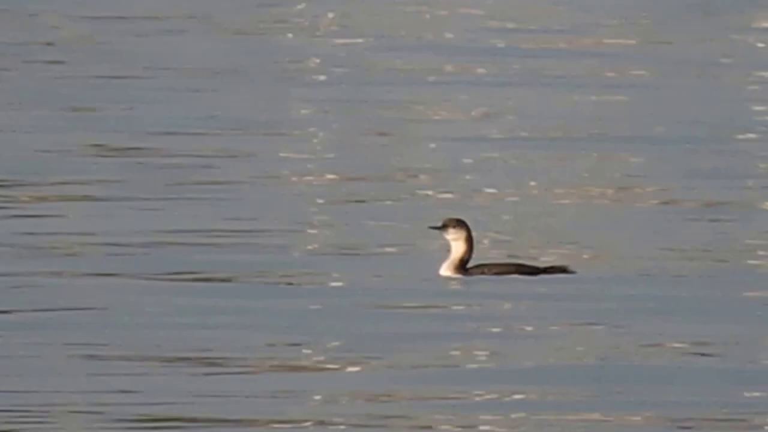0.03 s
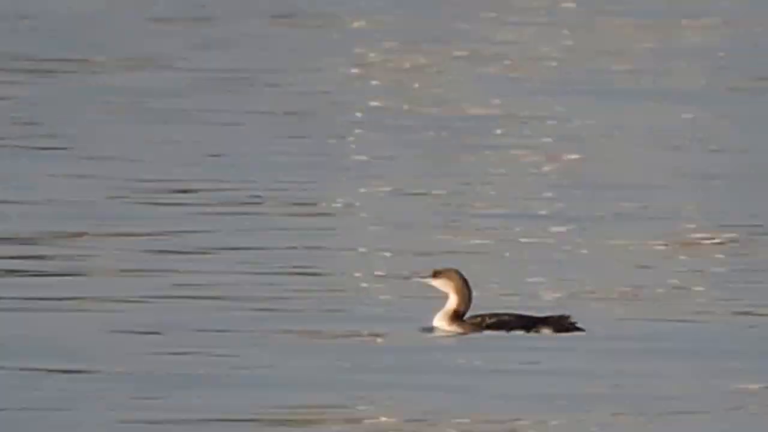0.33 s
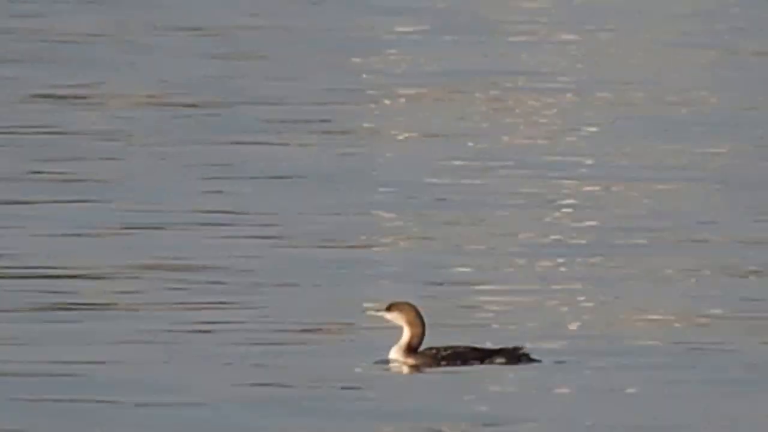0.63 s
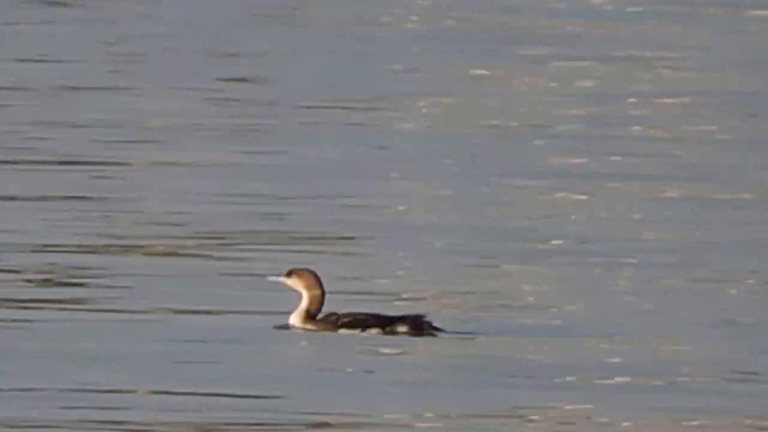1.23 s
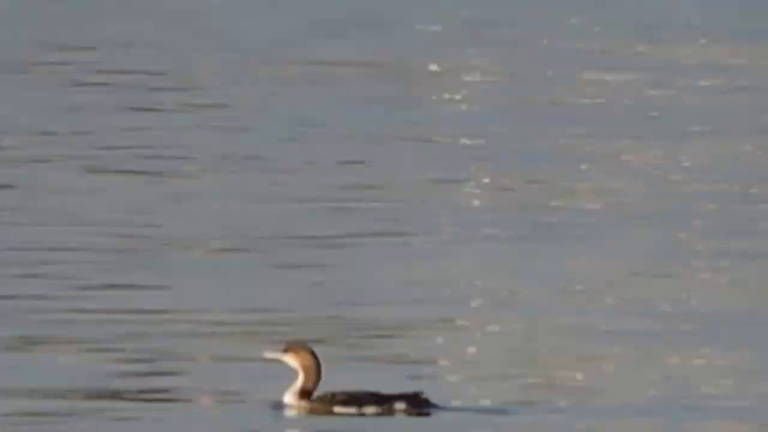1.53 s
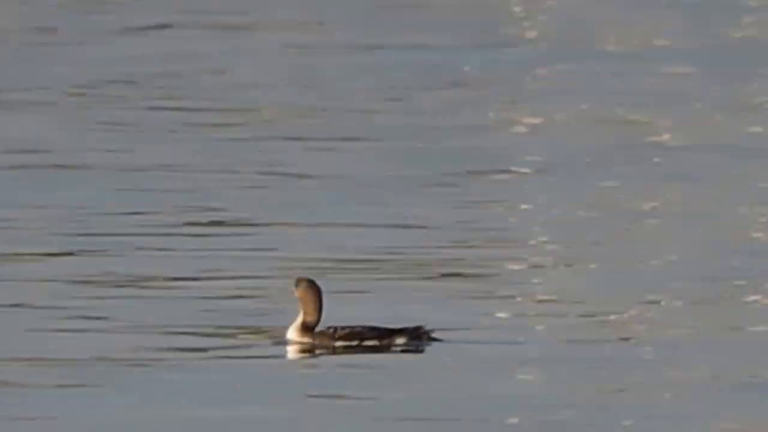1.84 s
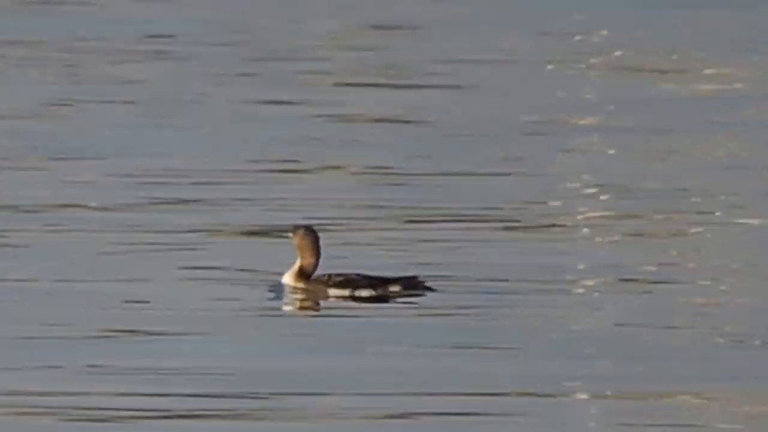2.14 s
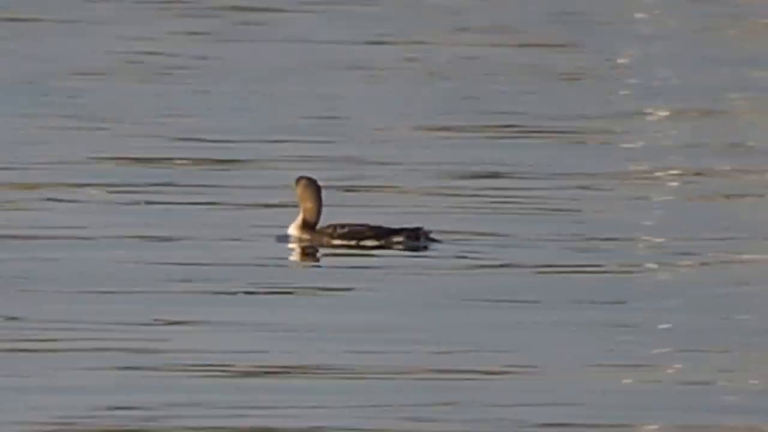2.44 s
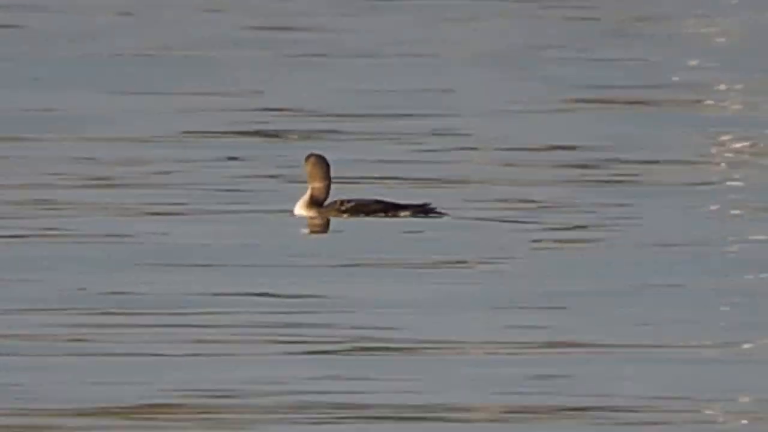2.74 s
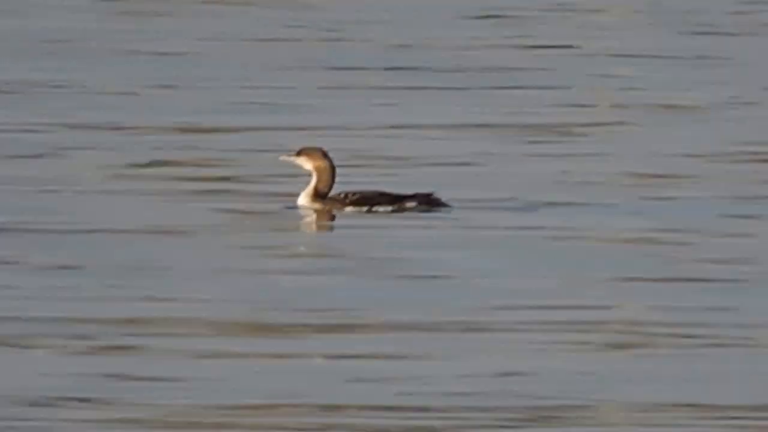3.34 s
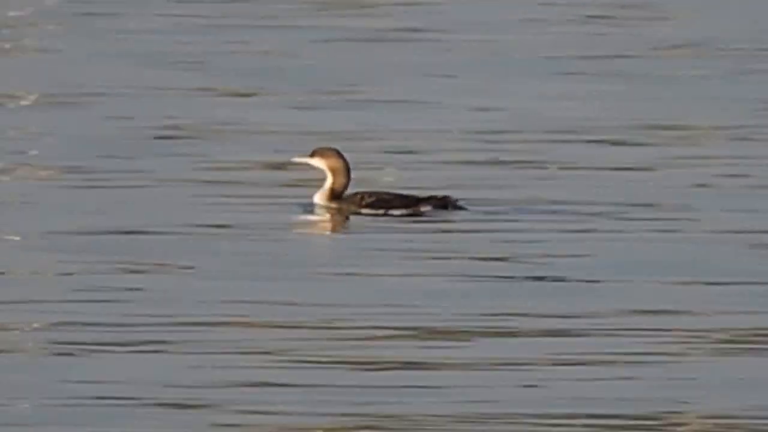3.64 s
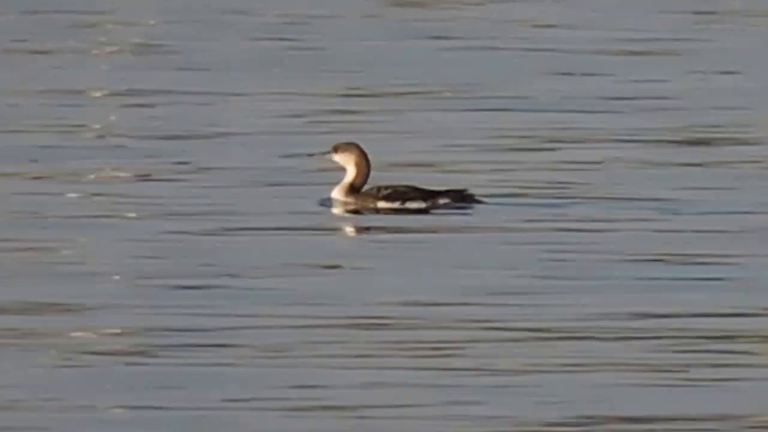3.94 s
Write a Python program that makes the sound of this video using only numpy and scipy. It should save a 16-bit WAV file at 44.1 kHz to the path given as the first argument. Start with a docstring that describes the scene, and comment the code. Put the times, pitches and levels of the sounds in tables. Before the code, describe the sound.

Low distant rumble continues over calm water, under soft traffic rush and an even hiss.

```python
"""Beside a calm lake, on a stereo microphone pair: a deep rumble, probably far engines, lies
in the middle, and the soft tyre rush of a distant road swells and eases on the left.
Diffuse open air surrounds both, under the even hiss of the microphones."""
import sys
import numpy as np
from scipy import signal
from scipy.fft import rfft, irfft
from scipy.io import wavfile
from scipy.ndimage import uniform_filter1d

SR = 44100
rng = np.random.default_rng(int(sys.argv[2]) if len(sys.argv) > 2 else 0)


def unload_wav(signal):
    """Save mono or channel-first audio to the path in sys.argv[1] as 16-bit WAV at rate SR, clipped to [-1, 1]."""
    wavfile.write(
        sys.argv[1],
        SR,
        np.round(np.clip(np.atleast_2d(signal).T, -1, 1) * 32767).astype(np.int16),
    )


N = 176400

# Spectrum of the far rumble, centre of the pair: f/Hz, level/dB (relative, per Hz)
RUMBLE_SPECTRUM = [(12, -8), (22, -5.5), (32, -2.5), (52, -1), (76, 1.5), (105, -5), (128, -4.5),
                   (165, -13.5), (220, -21), (300, -30)]


def far_rumble():
    """Deep, wavering rumble, probably distant engines, nearly the same at both microphones."""
    rumble = shaped_noise(RUMBLE_SPECTRUM) * waver(depth_db=.78, per_s=4.04)
    return place_on_pair(rumble * gain(-41), left_db=-.5, left_lead_ms=.22)


# Spectrum of the distant road: f/Hz, level/dB (relative, per Hz)
ROAD_SPECTRUM = [(250, -5), (450, -3), (650, 1), (950, 0), (1400, -4.5), (2000, -13), (3000, -17)]
# Swells of the road as they reach the shore: t/s, level/dB
ROAD_SWELLS = [(0, -56), (.29, -56.5), (.6, -57.5), (.82, -57), (.97, -55), (1.08, -57.5), (1.25, -55),
               (1.44, -57.5), (1.68, -56.5), (2.1, -57), (2.7, -57.5), (3.4, -58), (4, -57.4)]


def distant_road():
    """Tyre rush carried over the water from the left, swelling and easing."""
    times, levels_db = np.array(ROAD_SWELLS).T
    swell = gain(np.interp(np.arange(N) / SR, times, levels_db))
    tyres = shaped_noise(ROAD_SPECTRUM) * waver(depth_db=1, per_s=8.95)
    return place_on_pair(tyres * swell, left_db=8, left_lead_ms=.087)


# Spectrum of the open air all round the pair: f/Hz, level/dB (relative, per Hz)
AIR_SPECTRUM = [(12, 11), (40, 5), (120, 3), (250, -3), (420, -3.5), (700, -11.5), (1200, -14.5),
                (1700, -10), (2500, -13), (4200, -20.5), (6000, -24)]


def open_air():
    """Soft wash from all sides, unrelated at the left and right microphones."""
    sides = [shaped_noise(AIR_SPECTRUM) * waver(depth_db=.1, per_s=5) for _ in range(2)]
    return gain(-54) * np.array(sides)


# Spectrum of the microphones' own noise: f/Hz, level/dB (relative, per Hz)
HISS_SPECTRUM = [(300, -1), (2000, -1.5), (3500, 1), (5500, -0.85), (8000, -3.5), (10000, -5.5),
                 (12500, -8.5), (15500, -12)]


def microphone_hiss(common_power=.34):
    """Even self-noise, with a share of its power common to both channels."""
    separate = np.array([shaped_noise(HISS_SPECTRUM) for _ in range(2)])
    common = shaped_noise(HISS_SPECTRUM)
    return gain(-62) * (np.sqrt(common_power) * common + np.sqrt(1 - common_power) * separate)


def gain(db):
    """Decibels to amplitude gain."""
    return 10 ** (np.asarray(db) / 20)


def shaped_noise(spectrum, skirt_db_per_octave=13.5):
    """Noise of rms 1 that follows (f/Hz, level/dB) points and falls away beyond their ends."""
    hz, db = np.array(spectrum, float).T
    octave = np.log2(np.maximum(np.arange(N // 2 + 1) * SR / N, 1))
    knots = np.log2(hz)
    octaves_outside = np.abs(octave - np.clip(octave, knots[0], knots[-1]))
    shape_db = np.interp(octave, knots, db) - skirt_db_per_octave * octaves_outside
    noise = irfft(rfft(rng.standard_normal(N)) * gain(shape_db), N)
    return noise / noise.std()


def waver(depth_db, per_s):
    """A wandering gain: random levels held 1 / per_s seconds and smoothed twice."""
    hold = int(SR / per_s)
    steps = rng.standard_normal(1024)[np.arange(N) // hold % 1024]
    drift = uniform_filter1d(uniform_filter1d(steps, hold), hold)
    return gain(depth_db * (drift - drift.mean()) / drift.std())


def place_on_pair(source, left_db, left_lead_ms):
    """Positive values make a source louder and earlier at the left microphone."""
    hz = np.arange(N // 2 + 1) * SR / N
    left = irfft(rfft(source) * np.exp(2j * np.pi * hz * left_lead_ms / 1000), N)
    balance = gain([[left_db / 2], [-left_db / 2]])
    return np.array([left, source]) * balance / np.sqrt(np.mean(balance ** 2))


def scene():
    """The lakeside from one spot; all layers sound throughout."""
    return far_rumble() + distant_road() + open_air() + microphone_hiss()


def record(dry, silence_s=.036, fade_s=.002, top_hz=15750):
    """The sound opens after an instant of silence; the top is cut steeply."""
    fade_in = np.clip((np.arange(N) / SR - silence_s) / fade_s, 0, 1)
    lowpass = signal.ellip(12, .1, 80, top_hz, fs=SR, output="sos")
    return signal.sosfilt(lowpass, dry * fade_in)


dry = scene()
out = record(dry)
unload_wav(out)
```